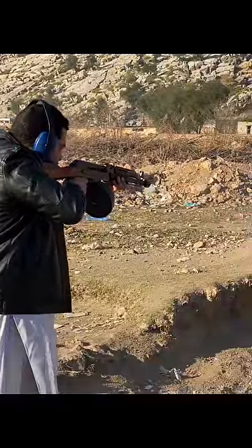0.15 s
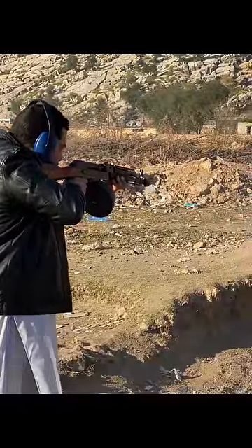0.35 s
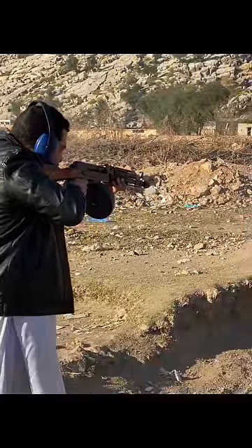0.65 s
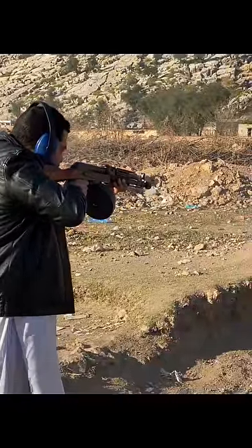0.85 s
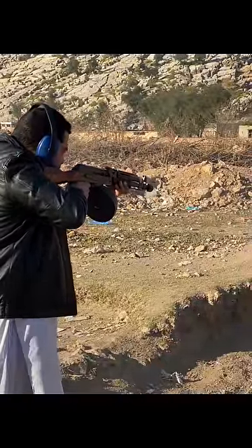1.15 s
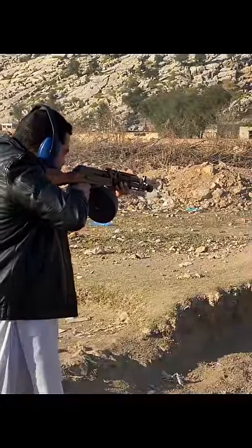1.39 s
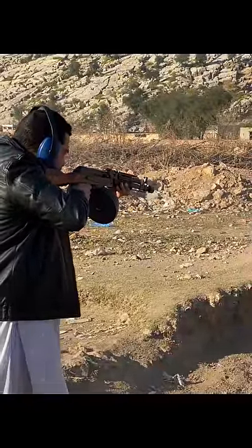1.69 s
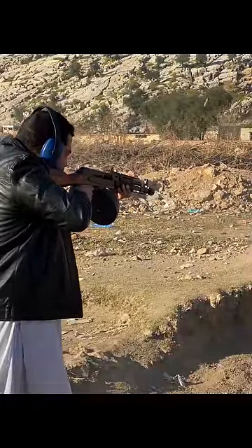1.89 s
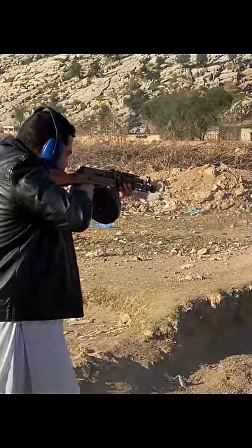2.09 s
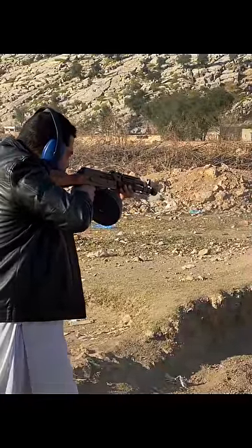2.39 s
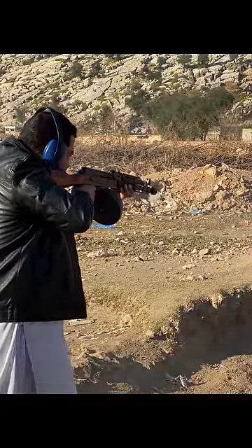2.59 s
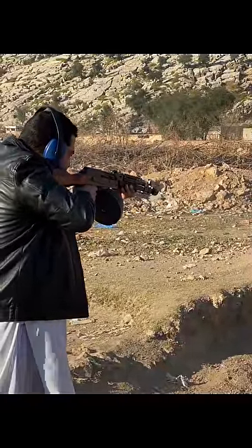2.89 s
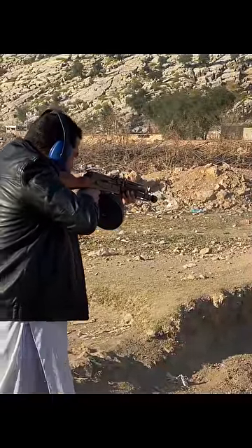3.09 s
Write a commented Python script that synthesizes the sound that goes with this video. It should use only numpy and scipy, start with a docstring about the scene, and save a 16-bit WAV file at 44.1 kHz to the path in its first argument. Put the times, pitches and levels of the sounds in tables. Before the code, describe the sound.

Automatic gunfire hammers very close by on open stony ground, stopping just before the end.

```python
"""Open, stony ground: a drum-fed automatic rifle fires a long burst two steps from a phone; it stops near the end.
Each round: steel noise of the bolt slamming shut, a filtered pulse and gas noise as the blast, steel noise of
the bolt running back. Decaying noise tails and delayed copies answer from ground, an earth bank and far slopes.
The phone rings ahead of each blast, delays the bass behind the treble and limits the peaks."""
import sys
import numpy as np
from scipy import signal
from scipy.fft import rfft, irfft, next_fast_len
from scipy.io import wavfile
from scipy.ndimage import uniform_filter1d

SR = 44100
rng = np.random.default_rng(int(sys.argv[2]) if len(sys.argv) > 2 else 0)


def bounce(signal):
    """Save signal as a 16-bit WAV file at the path given by the first command-line argument."""
    frames = np.transpose(np.atleast_2d(signal))
    limited = np.clip(frames, -1, 1)
    pcm = np.round(limited * 32767).astype(np.int16)
    wavfile.write(sys.argv[1], SR, pcm)


def invert_db(level):
    """Linear amplitude ratio for a level in decibels (20 dB per decade), elementwise."""
    return 10 ** (np.asarray(level, dtype=float) / 20)


N = 143325
LEAD = SR // 2  # run-in before the audible part, samples
M = N + LEAD

# Open-air hush. Each row: frequency in Hz, relative level in dB.
AIR_SPECTRUM = [(30, -9), (100, 5.5), (500, -1), (3000, -22), (12000, -78)]
AIR_DB = -34

# Rounds of the burst. Each row: time in seconds, strength in dB, boom in dB, bark in dB.
SHOTS = [(0.106, -1.3, -0.5, -1), (0.2187, 0.5, -9, -4), (0.3288, -0.2, 1.5, -0.5), (0.443, -1.5, 0.5, -2),
         (0.5626, 0.2, -10, 0.5), (0.681, -0.5, 2, -4), (0.789, 0.3, 3, -5), (0.9023, 0.5, 2, -3),
         (1.0103, -1, 4.5, 0), (1.1325, -0.2, 4, 0.5), (1.2505, -1, 2, 1.5), (1.365, -0.5, -1.5, -2),
         (1.472, -1.5, -1.5, 1), (1.5807, -1.5, 2.5, -1), (1.6892, -2.2, 3.5, 2), (1.8113, -2, -4, 1),
         (1.923, -2.2, 4.5, 3.5), (2.031, -1.4, -2, 2), (2.1417, -1.1, 0, -2), (2.2473, -1, 4, 1),
         (2.3626, 0, 5, -3.5), (2.47, -2.2, 1, 3.5), (2.5783, -1.7, -3, 1.5), (2.7017, -2.6, 1, 0.5),
         (2.806, -2.4, 6.5, 5)]
# Rounds fired just before, still echoing: times in seconds.
EARLIER_SHOTS_S = [-.35, -0.27, -.13, -.0175]

# Decay of near scatter and of far scatter. Each row: frequency in Hz, T60 in seconds.
STONES_T60 = [(50, 0.91), (120, 0.46), (400, 0.33), (1000, 0.29), (3000, 0.18), (10000, 0.13)]
SLOPES_T60 = [(50, 0.74), (200, 0.89), (1000, 1.52), (4000, 0.95), (10000, 0.68)]
# Colour of near and far scatter. Each row: frequency in Hz, relative level in dB.
STONES_TONE = [(35, 7.5), (62, 13.5), (120, -2.5), (500, -3), (2000, 2.5), (10000, -3)]
SLOPES_TONE = [(40, 7), (120, 13), (500, -1.5), (2000, -3), (10000, -4)]
# Width of the scatter. Each row: frequency in Hz, side over mid in dB.
SCATTER_SIDE = [(50, -29), (150, -8.5), (600, -1.5), (3000, -32)]
STONES_DB, SLOPES_DB = -6.5, -15
STONES_BUILD_S, SLOPES_BUILD_S = 0.00073, 0.11  # time constants of the fade-in

# Delays in ms of the earth bank and ditch, and of the far slopes.
BANK_MS = [26, 33.8, 40, 53, 70]
HILL_MS = [187, 245, 292, 325, 349]
# Bank echoes, slope echoes and slope bass. Each row: level in dB, sign, dull above Hz, thin below Hz.
BANK = [(-13.5, 0.65, 2900, 120), (4.5, 1, 660, 283), (-4.5, -0.98, 1060, 280), (-7.5, -0.8, 620, 44),
        (-2, 0.71, 170, 85)]
HILL = [(-25, 1, 1100, 300), (-19, 1, 1800, 1100), (-22, 0.89, 2200, 900), (-30, 0.8, 1600, 960),
        (-16, 0.84, 1900, 1000)]
HILL_THUMP = [(-7, 1, 270, 37), (-16, 0.83, 360, 150), (-6.5, 1, 140, 41), (-37, 1, 320, 100),
              (-7.5, 1, 320, 70)]

# Bolt and receiver. Each row: frequency in Hz, relative level in dB.
STEEL_SPECTRUM = [(290, 6), (500, 4), (1480, -1), (6610, -4), (8580, -10), (9490, -6), (12100, -12.5),
                  (14200, -19), (16000, -25)]
# Strokes of the action round each shot. Each row: start in ms, rise in ms, T60 in ms, level in dB.
STROKES = [(-22.5, 10.1, 57, -20), (10, 14.1, 55, -23.5), (28.5, 9.6, 31, -27.5)]
STROKE_SCATTER_S, STROKE_VARIES_DB, RATTLE_DB = 0.00098, 0.48, 0.5  # rms
STEEL_SIDE_DB = -44
LAST_SLAM_START_S, LAST_SLAM_DB = 2.897, -1.5  # closes once more without firing; dB over the first stroke

# Recorder's pre-ringing ahead of each blast.
PRERING_DB, PRERING_T60_S, PRERING_DROP_S = -15, 0.0245, 0.0017
PRERING_HZ, PRERING_SIDE_DB = (340, 1175), -14

# Muzzle gas. Each row: frequency in Hz, relative level in dB.
GAS_SPECTRUM = [(150, -36), (400, 7), (1000, 1.5), (2500, -0.5), (6000, -4), (10000, -4.5), (13000, -11.5),
                (16000, -25)]
GAS_DB, GAS_RISE_S, GAS_T60_S, GAS_SIDE_DB = -4.5, 0.00052, 0.012, -14
GAS_AGAIN_S, GAS_AGAIN_DB = 0.00414, -8.5  # return off the ground

# Blast pulse. Each row: frequency in Hz, relative level in dB.
BLAST_SPECTRUM = [(18, -53), (30, 4), (60, 3.5), (124, 3), (220, -2.5), (500, 4), (630, -0.5), (800, 1),
                  (1630, -10.5), (1860, -2.5), (2060, -16), (2480, -9), (2750, -26), (5040, -17),
                  (8520, -19), (10200, -17.5), (12000, -25), (14400, -35), (16000, -52)]
BLAST_DB = 24.5
BOOM_HZ, BARK_HZ, HUMP_OCTAVES = 118.6, 307, 0.43  # parts that change from round to round
# Direct blast and its returns from the shooter and the ground.
# Each row: delay in ms, level in dB, sign, dull above Hz, thin below Hz.
ARRIVALS = [(0, 7, 0.8, 11300, 21), (2.4, 4.5, -0.5, 20000, 290), (4.3, 3, -0.65, 8300, 87),
            (6, 3, 0.99, 1400, 316)]
ARRIVAL_SCATTER_MS, ARRIVAL_VARIES_DB = 0.31, 1  # rms; the gun moves under recoil

# Level between the ports. Each row: frequency in Hz, left over right in dB.
PORT_DB = [(60, -6), (130, 4), (290, -2), (640, 6), (1410, -0.5), (3100, 1.5), (6820, -1), (15000, -0.5)]
# Phase between the ports. Each row: frequency in Hz, lead of the left in radians.
PORT_RAD = [(0, 1), (600, 0.7552), (1210, 1.5), (1890, 1.16), (3010, 0), (7410, 0.07), (9730, -6),
            (10500, -6.5), (11700, -9), (12700, -9), (13500, -17), (14600, -12), (15200, -16), (16000, -11)]
BASS_LAG_CYCLES, LAG_ENDS_HZ = 1.512, 3790  # well below the end, each frequency is this many cycles late
BASS_CUT_HZ = 24.3
CEILING, KNEE = 0.81, 12  # full scale is 1; a higher knee is harder


def along(points, hz):
    """Interpolates (Hz, value) points on a log frequency axis."""
    f, v = np.transpose(points)
    return np.interp(np.log(hz + 1), np.log(f + 1), v)


def filtered(x, response):
    """x times a complex response of frequency."""
    m = next_fast_len(x.shape[-1] + SR // 2)
    spectrum = rfft(x, m) * response(np.fft.rfftfreq(m, 1 / SR))
    return irfft(spectrum, m)[..., :x.shape[-1]]


def noise(spectrum, channels=1):
    """Coloured noise of rms 1."""
    x = filtered(rng.standard_normal((channels, M)), lambda hz: invert_db(along(spectrum, hz)))
    return x / x.std()


def train(times_s, dbs):
    """One spike per event, on a time line that starts LEAD samples early."""
    x = np.zeros(M)
    x[np.round(np.asarray(times_s) * SR).astype(int) + LEAD] = invert_db(dbs)
    return x


def swell(spikes, rise_s, t60_s):
    """Each spike becomes a quadratic rise and an exponential decay."""
    t = np.arange(SR // 5) / SR
    shape = np.where(t < rise_s, (t / rise_s) ** 2, invert_db(-60 * (t - rise_s) / t60_s))
    return np.abs(signal.fftconvolve(spikes, shape)[:M])


def rounds():
    """Times, strengths, boom and bark of all rounds."""
    return np.transpose([(s, 0, 0, 0) for s in EARLIER_SHOTS_S] + SHOTS)


def copies(hz, rows):
    """Response of delayed, signed copies, each with a narrower band."""
    total = 0
    for ms, db, sign, top, low in rows:
        delay = np.exp(-2j * np.pi * hz * ms / 1000)
        band = hz ** 2 / (hz ** 2 + low ** 2) / (1 + (hz / top) ** 4)
        total = total + sign * invert_db(db) * delay * band
    return total


def air():
    """Steady open-air hush, independent in the two channels."""
    return invert_db(AIR_DB) * noise(AIR_SPECTRUM, channels=2)


def scatter(x, t60s, tone, build_s):
    """Many small reflectors, alike for every shot; each frequency dies at its own speed: mid and side."""
    hz, t, z = signal.stft(rng.standard_normal((2, SR)), SR, nperseg=512)
    z[1] *= invert_db(along(SCATTER_SIDE, hz))[:, None]
    decay_db = along(tone, hz)[:, None] - 60 * t / along(t60s, hz)[:, None]
    tail = signal.istft(z * invert_db(decay_db), SR, nperseg=512)[1]
    tail = tail * (1 - np.exp(-np.arange(tail.shape[1]) / (build_s * SR)))
    tail = tail / np.linalg.norm(tail[0])
    return signal.fftconvolve(x[None], tail, axes=1)[:, :M]


def slopes(shot):
    """Far scatter, building up slowly."""
    return invert_db(SLOPES_DB) * scatter(shot, SLOPES_T60, SLOPES_TONE, SLOPES_BUILD_S)


def stones(shot):
    """Near scatter, there almost at once."""
    return invert_db(STONES_DB) * scatter(shot, STONES_T60, STONES_TONE, STONES_BUILD_S)


def echoes(hz):
    """The bank returns the bare pulse; the far slopes a thump, and the pulse with its near returns."""
    bank = [(ms, *row) for ms, row in zip(BANK_MS, BANK)]
    hill = [(ms, *row) for ms, row in zip(HILL_MS, HILL)]
    thump = [(ms, *row) for ms, row in zip(HILL_MS, HILL_THUMP)]
    return copies(hz, bank + thump) + copies(hz, hill) * copies(hz, ARRIVALS)


def action():
    """The bolt slams shut before each round, then runs back, throwing the case and feeding: mid and side."""
    s = rounds()[0]
    env = swell(train([LAST_SLAM_START_S], STROKES[0][3] + LAST_SLAM_DB), 0.0032, 0.13)
    for ms, rise_ms, t60_ms, db in STROKES:
        chance = rng.standard_normal((len(s), 2))
        start_s = s + ms / 1000 + STROKE_SCATTER_S * chance[:, 0]
        strokes = train(start_s, db + STROKE_VARIES_DB * chance[:, 1])
        env += swell(strokes, rise_ms / 1000, t60_ms / 1000)
    rattle = uniform_filter1d(rng.standard_normal(M), size=40)
    env = env * invert_db(RATTLE_DB * rattle / rattle.std())
    return env * noise(STEEL_SPECTRUM, channels=2) * invert_db([[0], [STEEL_SIDE_DB]])


def preringing():
    """Recorder's pre-ringing: mid-band noise swells just before each blast, a decay run backwards: mid and side."""
    s, db, *_ = rounds()
    lo, hi = PRERING_HZ
    ripple = noise([(lo / 2, -30), (lo, 0), (hi, 0), (hi * 2, -30)], channels=2)
    backwards = train(-s + (N - LEAD) / SR, db + PRERING_DB)
    env = swell(backwards, PRERING_DROP_S, PRERING_T60_S)[::-1]
    return env * ripple * invert_db([[0], [PRERING_SIDE_DB]])


def gas():
    """Turbulent crack from the muzzle, new for each round, once more off the ground: mid and side."""
    s, db, *_ = rounds()
    spikes = train(s, db + GAS_DB) + train(s + GAS_AGAIN_S, db + GAS_DB + GAS_AGAIN_DB)
    env = swell(spikes, GAS_RISE_S, GAS_T60_S)
    return env * noise(GAS_SPECTRUM, channels=2) * invert_db([[0], [GAS_SIDE_DB]])


def hump(hz, centre_hz):
    """Bell on an octave axis."""
    return np.exp(-(np.log2((hz + 1) / centre_hz) / HUMP_OCTAVES) ** 2)


def blast(late_s=0, more_db=0):
    """The pressure pulse of each round, with its own boom and bark."""
    s, db, boom_db, bark_db = rounds()
    level_db = db + BLAST_DB + more_db
    plain = train(s + late_s, level_db)
    boom = train(s + late_s, level_db + boom_db) - plain
    bark = train(s + late_s, level_db + bark_db) - plain
    pulse = plain + filtered(boom, lambda hz: hump(hz, BOOM_HZ)) + filtered(bark, lambda hz: hump(hz, BARK_HZ))
    return filtered(pulse, lambda hz: invert_db(along(BLAST_SPECTRUM, hz)))


def direct():
    """The blast and its near returns, which shift a little from round to round."""
    chance = rng.standard_normal((len(rounds()[0]), len(ARRIVALS), 2))
    chance[:, 0] = 0  # the direct blast stays put
    total = 0
    for k, row in enumerate(ARRIVALS):
        late_s = ARRIVAL_SCATTER_MS / 1000 * chance[:, k, 0]
        pulse = blast(late_s, ARRIVAL_VARIES_DB * chance[:, k, 1])
        total = total + filtered(pulse, lambda hz: copies(hz, [row]))
    return total


def ports(mid, side):
    """The two microphone ports differ in level and phase, half of it on each."""
    def half(hz):
        return invert_db(along(PORT_DB, hz) / 2) * np.exp(0.5j * along(PORT_RAD, hz))
    return filtered(mid, lambda hz: np.array([half(hz), 1 / half(hz)])) + np.array([side, -side])


def microphone(hz):
    """Deep bass is cut and bass lags."""
    lag = np.exp(-2j * np.pi * BASS_LAG_CYCLES * np.log((hz + 1) / (hz + LAG_ENDS_HZ)))
    return lag / (1 + (BASS_CUT_HZ / (hz + 1)) ** 4)


def scene():
    """Open air, echoes and gun at the two ports, through the microphone."""
    pulse = blast()
    crack = preringing() + gas()
    shot = pulse + crack[0]
    mid, side = stones(shot) + slopes(shot) + crack + action()
    gun = ports(direct() + mid, side)
    returns = filtered(pulse, echoes) * invert_db([[1.2], [-1.2]])  # left 2.4 dB over right
    return filtered(gun + returns + air(), microphone)[:, LEAD:]


def band_limit(x):
    """A steep low-pass at the top of the band."""
    return signal.sosfilt(signal.butter(12, 16480, fs=SR, output="sos"), x)


def record(dry):
    """Peaks are rounded off at the ceiling."""
    mix = dry / (1 + np.abs(dry / CEILING) ** KNEE) ** (1 / KNEE)
    return band_limit(mix)


dry = scene()
out = record(dry)
bounce(out)
```